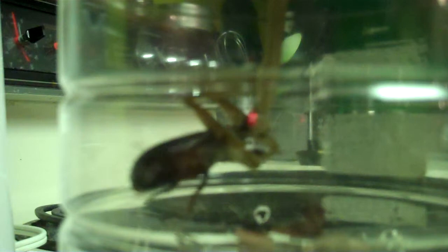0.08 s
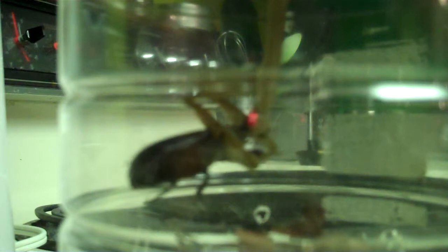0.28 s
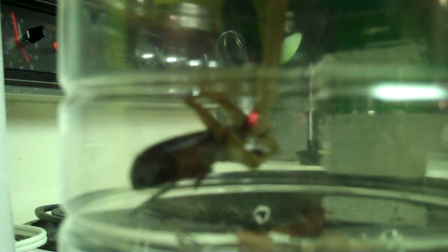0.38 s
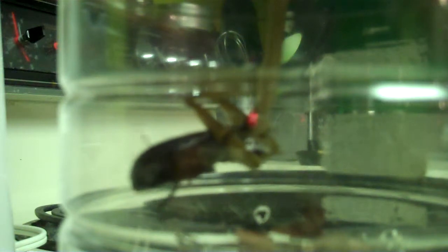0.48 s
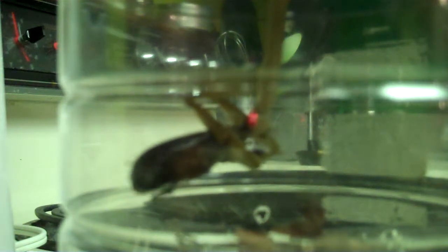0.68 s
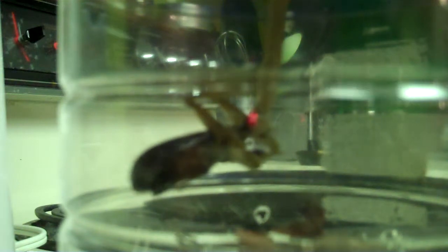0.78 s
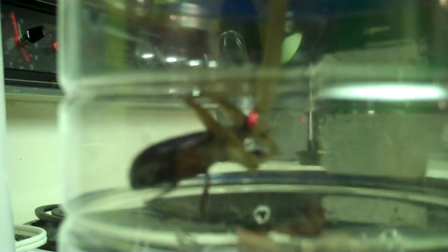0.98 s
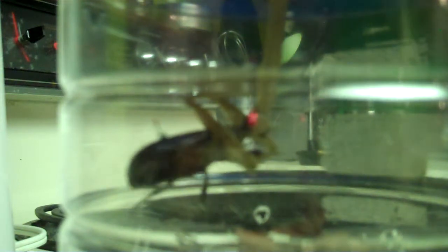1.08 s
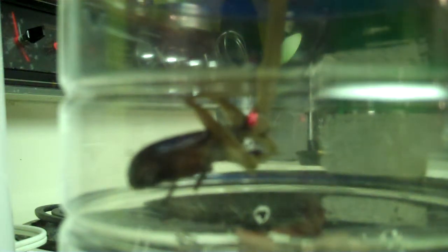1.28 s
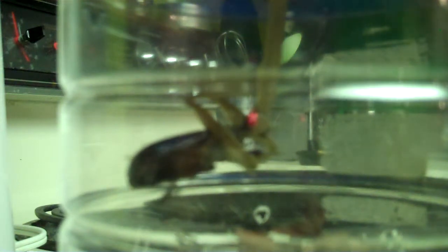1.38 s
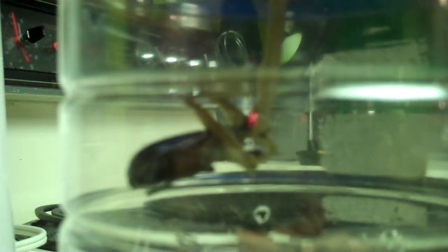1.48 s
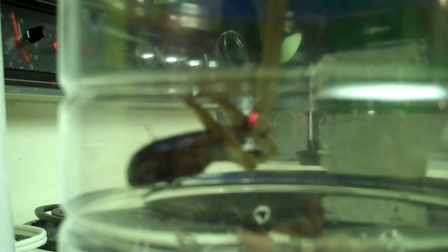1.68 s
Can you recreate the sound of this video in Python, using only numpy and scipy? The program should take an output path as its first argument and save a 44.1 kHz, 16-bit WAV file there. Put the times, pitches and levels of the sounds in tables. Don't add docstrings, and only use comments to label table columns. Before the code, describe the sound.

Beetle in a clear tub: one hard double knock, then soft scratchy leg drags and shuffling

```python
import sys
import numpy as np
from scipy import signal
from scipy.fft import rfft, irfft
from scipy.io import wavfile
from scipy.ndimage import uniform_filter1d

SR = 44100
rng = np.random.default_rng(int(sys.argv[2]) if len(sys.argv) > 2 else 0)


def dump(signal):
    limited = np.clip(np.atleast_2d(signal).T, -1, 1)
    pcm = np.round(limited * 32767).astype(np.int16)
    wavfile.write(sys.argv[1], SR, pcm)


def level_to_linear(level):
    exponent = np.asarray(level, float) / 20
    return 10 ** exponent


N = 74970


def evened(x):
    return x / np.sqrt(np.mean(x ** 2) + 1e-20)


def read(points, hz):
    f, value = np.transpose(points)
    return np.interp(np.log(hz + 1), np.log(f + 1), value)


def add(mix, s, sound):
    part = mix[..., round(s * SR):][..., :sound.shape[-1]]
    part += sound[..., :part.shape[-1]]


def pan(db):
    return level_to_linear(np.array([[db / 2], [-db / 2]]))


def filtered(x, order, hz, kind):
    return signal.sosfilt(signal.butter(order, hz, kind, fs=SR, output="sos"), x)


def resonate(x, hz, width):
    r = np.exp(-np.pi * width / SR)
    gain = np.sqrt(1 - r * r)
    feedback = [1, -2 * r * np.cos(2 * np.pi * hz / SR), r * r]
    return signal.lfilter([gain, 0, -gain], feedback, x) / (4 * np.sin(np.pi * hz / SR))


def ring(hz, db, t60, t):
    return level_to_linear(db - 60 * t / t60) * np.sin(2 * np.pi * hz * t)


def slips(rate, spread_db):
    draw = rng.random((N, 2))
    happens = draw < rate / SR
    boost = level_to_linear(spread_db * np.minimum(rng.exponential(1, (N, 2)), 4))
    return (happens * rng.standard_normal((N, 2)) * boost).T


def drag():
    # start in seconds, stop in seconds, strongest level in dB, brightness in dB
    strokes = [
        (0.361, 0.553, -58.5, -0.5),
        (0.883, 0.915, -65.5, 4),
        (0.901, 1.141, -59.5, -1.5),
        (1.152, 1.445, -64, 4.5),
        (1.398, 1.54, -65, 2.5),
        (1.503, 1.594, -63, 8.5),
        (1.552, 1.76, -56.5, 0),
    ]
    # pitch in Hz, width in Hz, level in dB, left-right difference in dB
    wall_modes = [(2423, 280, -4, -1), (3270, 41, -3.5, 4), (3793, 260, -3, -1.5), (4493, 230, -1, -2),
                  (5373, 380, -1, 2), (5930, 270, -5.5, -1), (6296, 130, -7.5, -10), (7066, 210, -3, 15),
                  (7447, 120, -5, 9.5), (7880, 220, -9.5, 14), (8320, 80, -10, 12.5)]
    swell_share, swell_db, release_s = 0.66, -11.5, 0.027
    alike, wash_db = 0.6, -10

    t = np.arange(N) / SR
    a, b = slips(9000, 1.5)
    drive = np.array([a, alike * a + np.sqrt(1 - alike ** 2) * b])
    modes = []
    for k, (hz, width, db, lr) in enumerate(wall_modes):
        rung = resonate(drive, hz, 1.7 * width)
        rung = resonate(rung, hz, 1.7 * width)
        modes.append(level_to_linear(db) * pan(lr) * evened(rung) * (-1) ** k)
    wash = evened(filtered(drive, 3, [2100, 8200], "band")) * pan(3.3)
    dull = sum(modes[:6]) + level_to_linear(wash_db) * wash
    bright = sum(modes[6:])
    scale = np.sqrt(np.mean((dull + bright) ** 2))
    flutter = level_to_linear(0.8 * evened(uniform_filter1d(rng.standard_normal(N), size=500)))

    out = np.zeros((2, N))
    for start, stop, db, bright_db in strokes:
        rise = np.clip((t - start) / ((stop - start) * swell_share), 0, 1)
        release = 20 * np.maximum(t - stop, 0) / release_s
        onset = np.clip((t - start) / 0.0023, 0, 1)
        shape = level_to_linear(db + swell_db * (1 - rise) - release) * onset
        out += shape * flutter * (dull / level_to_linear(bright_db) + bright) / scale
    return out


def knocks():
    # time in seconds, level in dB, deep share in dB, upper share in dB, push direction by sign
    shell_knocks = [
        (.2243, -39, -16, 6, -0.68),
        (.2248, -32, -17, -14.5, -1),
        (0.2404, -37.5, 2.5, 1, -1),
        (0.2424, -33, -5.5, 6, 1),
        (0.244, -27.5, -9.5, 0, -1),
        (.2538, -66, 13, 10, 0.45),
        (.2645, -48, 5, -1, 1),
    ]
    # pitch in Hz, level in dB, 60 dB decay in seconds
    tub_deep = [(135.9, -11, 0.27), (162, -1.5, 0.084), (196.8, -9.5, 0.25), (268, -11, 0.044)]
    tub_main = [(367.5, -14.5, 0.084), (402.3, -4, .055), (430.6, -13, 0.2)]
    tub_upper = [(678, -7, 0.037), (781, -9.5, 0.028), (1025, -2.5, 0.024), (1225, -6, 0.036),
                 (1770, -13.5, 0.022)]
    push_s, floor_hz = 0.0007, 122

    t, out = np.arange(SR // 3) / SR, np.zeros(N)
    deep, main, upper = (sum(ring(*mode, t) for mode in part) for part in (tub_deep, tub_main, tub_upper))
    for s, db, deep_db, upper_db, sign in shell_knocks:
        tub = level_to_linear(deep_db) * deep + main + level_to_linear(upper_db) * upper
        add(out, s, np.sign(sign) * level_to_linear(db) * tub)
    push = np.sin(np.pi * np.clip(t[:200] / push_s, 0, 1)) ** 2
    out = signal.oaconvolve(out, push / push.sum())[:N]
    return filtered(out, 2, floor_hz, "high") * pan(0.41)


def ticks():
    # time in seconds, level in dB, low ring level in dB, high ring level in dB
    contacts = [(.2245, -34, 1, -13), (.2256, -28.5, -8.5, 4.5), (.2275, -40, -2.5, -12),
                (.2360, -48, 7, -2), (.2398, -58, -5, 2), (.2411, -35.5, -4.5, 5), (.2438, -35, -3, -14.5),
                (.2455, -43, 5, -12), (.2535, -48, -1, -5), (.2640, -54, -17, 9), (.8922, -44.5, -3, -6),
                (.8945, -51, -6, 5)]
    # pitch in Hz, level in dB, 60 dB decay in seconds, left-right in dB
    low_rings = [(2360, 1, 0.006, 9.5), (3590, 3.5, 0.013, 0), (4520, -1.5, 0.011, -3),
                 (5366, -7.5, 0.021, 4)]
    high_rings = [(6330, -2, 0.0091, 4.5), (7000, -6.5, 0.012, 9.3), (7460, -6, 0.014, 13.5),
                  (8650, -19, 0.014, 3.4)]
    crack_db, crack_s = -1, 0.0045

    t, out = np.arange(2000) / SR, np.zeros((2, N))
    crack = np.diff(rng.standard_normal((len(contacts), 2, len(t) + 1)))
    detune = 1 + 0.035 * rng.standard_normal((len(contacts), 2))
    for (s, db, low_db, high_db), noise, (d_low, d_high) in zip(contacts, crack, detune):
        low = sum(ring(hz * d_low, level, t60, t) * pan(lr) for hz, level, t60, lr in low_rings)
        high = sum(ring(hz * d_high, level, t60, t) * pan(lr) for hz, level, t60, lr in high_rings)
        snap = noise * level_to_linear(crack_db - 60 * t / crack_s)
        add(out, s, level_to_linear(db - 7.5) * (level_to_linear(low_db) * low + level_to_linear(high_db) * high + snap))
    return filtered(out, 4, 9800, "low")


def shuffle():
    # time in seconds, level in dB
    foot_levels = [
        (0, -86),
        (.35, -69.5),
        (.6, -84),
        (.72, -65.5),
        (.9, -65),
        (1.05, -67.5),
        (1.25, -74.5),
        (1.4, -70.5),
        (1.58, -69),
        (1.7, -69.5),
    ]
    # pitch in Hz, width in Hz, level in dB
    floor_modes = [(400, 190, 2), (700, 430, -2.5), (1190, 870, -1.5), (1800, 170, -9)]
    a, b = slips(1500, 1.6)
    drive = np.array([a, 0.55 * a + 0.7 * b])
    body = sum(level_to_linear(db) * evened(resonate(drive, hz, width)) for hz, width, db in floor_modes)
    s, db = np.transpose(foot_levels)
    return evened(body) * level_to_linear(np.interp(np.arange(N) / SR, s, db)) * pan(3.2)


def room(x):
    t60, floor_hz = 0.19, 880
    t = np.arange(SR // 5) / SR
    fade_in = np.clip(t / 0.0016, 0, 1)
    tail = rng.standard_normal((2, len(t))) * level_to_linear(-60 * t / t60) * fade_in
    tail = filtered(tail, 2, floor_hz, "high")
    return signal.fftconvolve(x, tail / np.linalg.norm(tail[0]), axes=1)[:, :N]


def whine():
    whine_band = (6150, 100, -72.5)
    hz, width, db = whine_band
    waver = level_to_linear(2.0 * evened(uniform_filter1d(rng.standard_normal(N), size=6000)))
    return level_to_linear(db) * waver * evened(resonate(rng.standard_normal((2, N)), hz, width))


def air():
    # pitch in Hz, level in dB per Hz
    hiss_colour = [(20, -1), (87, -7), (263, -7), (587, -3), (1000, -4.5), (3000, -9.5), (8000, -12.5),
                   (14500, -16)]
    # pitch in Hz, left-right likeness from -1 to 1
    hiss_alike = [(60, -0.31), (240, 0.35), (940, 0.34), (3730, -0.0071), (14800, -0.1)]
    # pitch in Hz, left-right difference in dB
    hiss_pan = [(60, 1.5), (240, 6.5), (940, 3.5), (3730, 3.5), (14800, 1)]
    # pitch in Hz, rms level in dB
    hum_tones = [(50, -95), (120, -84.5), (360, -82), (721, -83), (1200, -80), (1440, -85.5), (1680, -83)]
    hz, t = np.fft.rfftfreq(N, 1 / SR), np.arange(N) / SR
    a, b = rfft(rng.standard_normal((2, N)))
    same = np.clip(read(hiss_alike, hz), -1, 1)
    side = level_to_linear(read(hiss_pan, hz) / 2)
    right = same * a + np.sqrt(1 - same ** 2) * b
    spectrum = np.array([a * side, right / side]) * level_to_linear(read(hiss_colour, hz))
    hiss = level_to_linear(-59.5) * evened(irfft(spectrum, N))
    hum = sum(np.sqrt(2) * level_to_linear(db) * np.sin(2 * np.pi * (f * t + rng.random())) for f, db in hum_tones)
    return hiss + hum * pan(1.3)


def scene():
    beetle = drag() + knocks() + ticks() + shuffle()
    return beetle + level_to_linear(-8) * room(beetle) + whine() + air()


def low_pass(x):
    return signal.sosfilt(signal.butter(12, 15350, fs=SR, output="sos"), x)


def record(dry):
    edge = signal.firwin(801, 14280, window=("kaiser", 7), fs=SR)
    mix = signal.oaconvolve(dry, edge[None], "same", axes=1)
    return low_pass(mix)


dry = scene()
out = record(dry)
dump(out)
```